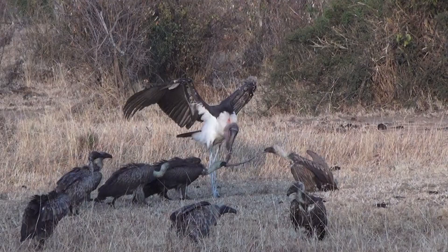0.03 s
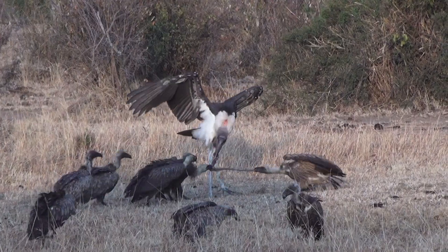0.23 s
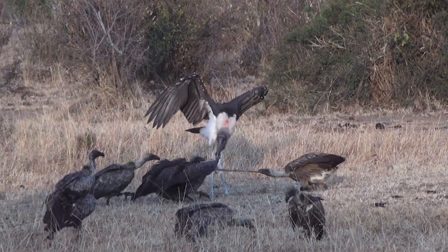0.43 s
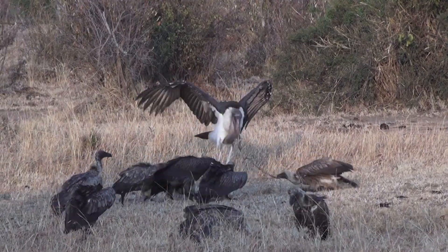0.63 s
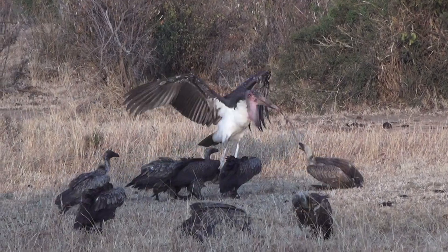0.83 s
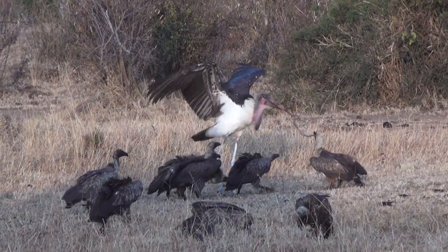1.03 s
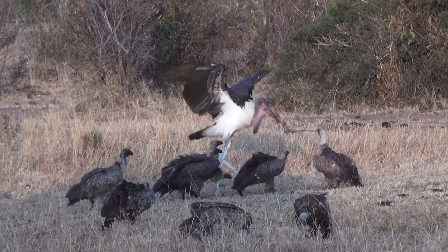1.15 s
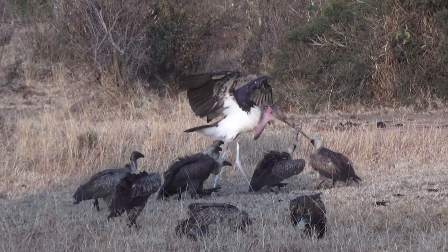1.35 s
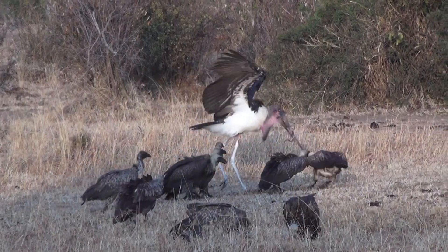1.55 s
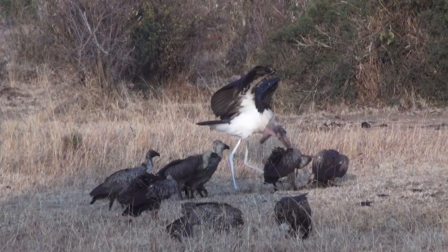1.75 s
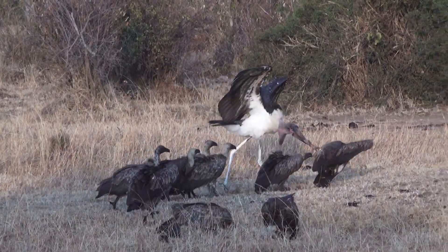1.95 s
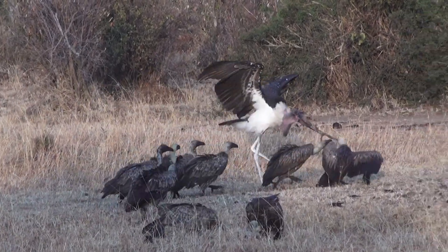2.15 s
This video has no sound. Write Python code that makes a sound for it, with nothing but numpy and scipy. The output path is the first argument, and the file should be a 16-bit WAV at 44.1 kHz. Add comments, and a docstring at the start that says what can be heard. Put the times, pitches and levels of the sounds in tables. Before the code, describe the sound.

Vultures and a stork squabble to the right. A harsh hiss starts at 0.4 seconds, sinking and fading by 0.8. From 1 second, quick rasps swell, peak near 1.9 and die away over faint flock wheezing and shuffling. Dry stalks crackle briefly around 0.2 and 0.75. Wind buffets the microphone from 0.3 to 1 second, and close, dull handling bumps come throughout, strongest around 0.6 and 0.85.

```python
"""A long harsh hiss, then a quick run of two-part rasps that swells and dies: vultures and a stork
squabble over a scrap, off to the right. Their calls are rough air ringing in the throat.
Dry stalks crackle underfoot, and the rest of the flock wheezes and shuffles faintly.
Close by, wind buffets the microphone and the camera body bumps as it is handled."""
import sys
import numpy as np
from scipy import signal
from scipy.fft import rfft, irfft
from scipy.io import wavfile
from scipy.ndimage import uniform_filter1d

SR = 44100
rng = np.random.default_rng(int(sys.argv[2]) if len(sys.argv) > 2 else 0)


def to_wav(sig):
    """Store sig (one row per channel, or 1-D mono) as 16-bit WAV at the path in sys.argv[1].

    Samples outside -1..1 are clipped; the rate is SR.
    """
    pcm = np.clip(np.atleast_2d(sig), -1, 1) * 32767
    pcm = np.round(pcm).astype(np.int16)
    wavfile.write(sys.argv[1], SR, pcm.T)  # frames by channels


N = 97020
T = np.arange(N) / SR
HZ = np.maximum(np.arange(N // 2 + 1) * SR / N, 1)
OPPOSITE = np.array([[1], [-1]])   # flips the right channel, so a sound feels wide

# The dull tone of the camera body. Each row: frequency in Hz, level in dB.
BODY_COLOUR = [(60, -17), (130, 5.5), (210, 4), (300, 5), (420, -7), (600, -16), (900, -58), (1600, -64)]


def from_db(db):
    """Turn decibels into a gain to multiply by."""
    return 10 ** (np.asarray(db) / 20)


def rms_one(x):
    """Scale a sound to an average power of 1."""
    return x / np.sqrt(np.mean(x ** 2) + 1e-20)


def level(rows):
    """Gain over time, joining points of (seconds, dB)."""
    return from_db(np.interp(T, *np.transpose(rows)))


def noise(colour):
    """Steady noise shaped by points of (Hz, dB), falling away beyond the ends."""
    hz, db = np.transpose(colour)
    gain = from_db(np.interp(np.log(HZ), np.log(hz), db))
    roll_off = np.minimum(1, np.minimum(HZ / hz[0], hz[-1] / HZ)) ** 2
    return rms_one(irfft(rfft(rng.standard_normal(N)) * gain * roll_off, N))


def wander(span_s):
    """A random wobble; a longer span makes it slower."""
    return rms_one(uniform_filter1d(rng.standard_normal(N), int(span_s * SR)))


def grainy(colour, grain_db, grain_s):
    """Noise whose level flickers from grain to grain."""
    flicker = from_db(grain_db * wander(grain_s))
    return rms_one(noise(colour) * flicker)


def evened(x, span_s):
    """Take the slow chance swings in level out of a noise."""
    return x / np.sqrt(uniform_filter1d(x ** 2, int(span_s * SR)) + 1e-6)


def resonate(x, hz, width_hz):
    """A resonance: it lets through one band of frequencies."""
    r = np.exp(-np.pi * width_hz / SR)
    section = [1 - r, 0, r - 1, 1, -2 * r * np.cos(2 * np.pi * hz / SR), r * r]
    return rms_one(signal.sosfilt([section, section], x))


def glide(x, hz, width_hz):
    """A resonance whose centre moves."""
    r = np.exp(-np.pi * width_hz / SR)
    turn = np.exp(2j * np.pi * np.cumsum(hz) / SR)
    band = signal.lfilter([1], [1, -2 * r, r * r], x / turn)   # shift down to 0 Hz and smooth
    return rms_one((band * turn).real)


def burst(start, hold, attack, release):
    """A gain that rises, holds, then dies away; all times in seconds."""
    return np.clip((T - start) / attack, 0, 1) * np.exp(-np.maximum(T - start - hold, 0) / release)


def pan(x, pan_db, centred_above_hz=9200):
    """Place a sound left (+) or right (-); the microphone has no direction in the top treble."""
    ratio = from_db(pan_db / (1 + (HZ / centred_above_hz) ** 6))
    return irfft(rfft(x) * 2 * np.array([ratio, np.ones_like(ratio)]) / (1 + ratio), N)


def still_air():
    """Quiet air and microphone hiss, over a faint wide rumble."""
    # The tone of the air and hiss. Each row: frequency in Hz, level in dB.
    colour = [(25, -65), (100, 5), (350, 14.5), (600, 6.5), (1000, 6), (3000, 7.5), (7500, 0), (11000, 0),
              (18000, -2)]
    return from_db(-64.5) * noise(colour) + from_db(-76.5) * noise(BODY_COLOUR) * OPPOSITE


def far_hiss():
    """A thin, distant hiss, strongest at the start."""
    # Its loudness. Each row: time in seconds, level in dB.
    loudness = [(0, -72), (.13, -64.5), (.45, -72.5), (.8, -79)]
    # Its two-peaked tone. Each row: frequency in Hz, level in dB.
    colour = [(2600, -42), (3300, -6), (3850, -16), (4550, -2), (5300, -22), (6300, -47)]
    return level(loudness) * grainy(colour, grain_db=1.5, grain_s=0.009)


def flock():
    """The other birds wheeze and shuffle, blurring into one flickering noise."""
    # Their loudness. Each row: time in seconds, level in dB.
    loudness = [(0, -67.5), (.4, -64.5), (.8, -62), (1.05, -58.5), (1.4, -60), (1.6, -63), (2.2, -66)]
    # Their tone. Each row: frequency in Hz, level in dB.
    colour = [(600, -15), (1100, -11), (1550, -3), (2300, 3), (3000, -3), (3900, -9), (4800, -10),
              (6200, -22.5), (9000, -19.5)]
    return level(loudness) * grainy(colour, grain_db=2.0, grain_s=0.0067)


def grass_rustle():
    """Dry grass gives one faint, high rustle."""
    # Its loudness. Each row: time in seconds, level in dB.
    loudness = [(1.63, -82), (1.708, -64), (1.80, -83)]
    # Its tone. Each row: frequency in Hz, level in dB.
    colour = [(7000, -23), (11000, -6), (14500, -14)]
    return level(loudness) * grainy(colour, grain_db=5.0, grain_s=0.0024)


def stalk_crackles(snaps_per_s=2000):
    """Each crackle is a cluster of tiny snaps in dry stalks."""
    # The crackles. Each row: start in seconds, level in dB, length in seconds, centre in Hz.
    crackles = [(0.232, -58, 0.017, 2080), (0.232, -64, 0.008, 5640), (0.752, -49.5, 0.0049, 4640),
                (2.08, -62, 0.0011, 7200)]
    snaps = rng.standard_normal(N) * (rng.random(N) < snaps_per_s / SR) + 1e-18
    out = 0
    for start, db, length, hz in crackles:
        gain = from_db(db) * burst(start, length, attack=0.0005, release=0.0034)
        out += gain * resonate(snaps, hz, width_hz=0.51 * hz)
    return out


def wind():
    """Gusts buffet the microphone with a deep rumble, a little to the left."""
    # The gusts. Each row: time in seconds, level in dB.
    gusts = [(0, -66), (.17, -62), (.27, -39.5), (.31, -48), (.365, -36), (.42, -42), (.48, -49),
             (.54, -43), (.64, -40.5), (.715, -59.5), (.78, -55), (.875, -50.5), (.925, -44.5),
             (1.02, -60.5), (1.28, -69), (1.32, -67), (1.38, -71), (2.2, -71.5)]
    # The rumble's tone. Each row: frequency in Hz, level in dB.
    colour = [(22, -30), (36, -3.5), (60, 4), (110, 5.5), (165, -1), (240, -13.5), (400, -38), (700, -55)]
    buffet = pan(evened(noise(colour), span_s=0.0305), pan_db=3)
    sides = from_db(-14) * noise(colour) * OPPOSITE
    return level(gusts) * (buffet + sides)


def hand_rub():
    """A hand rubs on the camera body."""
    # The strokes. Each row: time in seconds, level in dB.
    strokes = [(0, -71), (.3, -65.5), (.37, -50.5), (.5, -66), (.61, -45), (.72, -68), (.8, -62.5),
               (.86, -39.5), (.93, -52.5), (1.03, -72), (1.27, -60), (1.34, -51.5), (1.48, -76),
               (1.66, -87), (1.76, -53), (1.87, -61), (2.2, -57.5)]
    return level(strokes) * evened(noise(BODY_COLOUR), span_s=0.0206)


def drone():
    """A low drone at the microphone comes and goes."""
    # Its loudness. Each row: time in seconds, level in dB.
    loudness = [(1.0, -81), (1.09, -66), (1.2, -48), (1.29, -63), (1.43, -53.5), (1.49, -72)]
    sounding = (T > loudness[0][0]) * (T < loudness[-1][0])
    hum = resonate(rng.standard_normal(N), hz=196, width_hz=57)
    return level(loudness) * sounding * evened(hum, span_s=0.022)


def body_bumps(rise_cycles=0.5):
    """Each bump swings the camera body for a few cycles, with a dull tick on top."""
    # The bumps. Each row: start in seconds, level in dB, pitch in Hz, relative tick strength in dB.
    bumps = [(0.274, -36, 122, -34), (0.352, -35.5, 199, -30), (0.362, -35.5, 154, -39),
             (0.377, -31.5, 207, -28), (0.436, -32, 148, -23), (0.591, -28, 169, -31),
             (0.603, -27.5, 151, -47), (0.633, -31.5, 142, -23), (0.832, -43, 293, -31),
             (0.844, -25.5, 195, -13), (0.854, -24.5, 136, -26), (0.87, -39, 65, -37),
             (0.888, -32.5, 306, -19.5), (1.017, -33.5, 203, -15), (1.307, -38.5, 186, -25),
             (1.319, -38, 212, -18), (1.347, -33.5, 216, -11.5), (1.377, -33.5, 217, -18),
             (1.427, -45, 246, -4), (1.704, -45.5, 235, -34), (1.763, -45, 290, -8), (1.974, -45, 305, -10),
             (2.185, -43.5, 300, -37)]
    # The tick's tone. Each row: frequency in Hz, level in dB.
    tick_colour = [(200, 8), (380, 13.5), (600, -5.5), (850, -6), (1200, -17.5), (1900, -47)]
    tick_noise = evened(noise(tick_colour), span_s=0.0057)
    out = 0
    for start, db, hz, tick_db in bumps:
        cycles = np.maximum(T - start, 0) * hz
        age = cycles / rise_cycles
        swing = age * np.exp(1 - age) * np.sin(2 * np.pi * cycles)
        tick = tick_noise * burst(start, hold=0.00465, attack=0.0017, release=0.00465)
        out += from_db(db) * (swing + from_db(tick_db + 3) * tick)
    return out


def housing_clicks():
    """Sharper clicks: the camera housing rings for a moment."""
    # The clicks. Each row: start in seconds, level in dB, pitch in Hz.
    clicks = [(1.026, -46.5, 890), (1.428, -39, 1110), (1.942, -48, 930)]
    out = 0
    for start, db, hz in clicks:
        ring = np.sin(2 * np.pi * hz * (T - start))
        out += from_db(db) * burst(start, hold=0, attack=0.00057, release=0.002) * ring
    return out


def handling(split_hz=183):
    """The camera is handled: deep sound leans left, higher sound right, clicks stay central."""
    upper_share = 1 / (1 + (split_hz / HZ) ** 6)
    pan_db = 6 * (1 - upper_share) - 3 * upper_share
    return pan(hand_rub() + drone() + body_bumps(), pan_db) + housing_clicks()


def thicket_echo(x, fade_s=0.058):
    """Add the faint scatter from the ground and the thicket behind."""
    tail = rng.standard_normal(SR // 2) * from_db(-60 * T[:SR // 2] / fade_s)
    return x + from_db(-14.5) * signal.fftconvolve(x, tail / np.linalg.norm(tail))[:N]


def rough_air(pulse_hz, rough, jitter):
    """Rushing air chopped by an uneven flutter in the throat."""
    cycles = np.cumsum(pulse_hz * np.exp(jitter * wander(span_s=0.005))) / SR
    flutter = np.exp(rough * np.cos(2 * np.pi * cycles))
    return rms_one(rng.standard_normal(N) * flutter)


def hiss_tail():
    """One narrow resonance slides down as the long hiss runs out."""
    # The slide. Each row: time in seconds, centre in Hz, level in dB.
    slide = [(0.551, 2960, -66), (.62, 2800, -58), (.68, 2470, -51), (.74, 2430, -56), (0.80, 2280, -61.5),
             (.85, 2200, -89)]
    times, hz, db = np.transpose(slide)
    sounding = (T > times[0]) * (T < times[-1])
    breath = glide(rng.standard_normal(N), np.interp(T, times, hz), width_hz=550)
    return from_db(np.interp(T, times, db)) * sounding * evened(breath, span_s=0.033)


def long_hiss(peak_s=0.529, sink_octaves_per_s=1.25, bill_closes_s=.58, closing_s=.04):
    """Rough air through sinking throat resonances; it darkens as the bill closes halfway."""
    # The push of breath. Each row: time in seconds, level in dB.
    loudness = [(.41, -71), (.44, -52), (.475, -43.5), (.52, -39.5), (.565, -44.5), (.59, -49.5),
                (.68, -54), (.75, -59), (.85, -96)]
    # Throat resonances. Each row: centre in Hz, width in Hz before widening,
    # level in dB with the bill wide open, level in dB with it half closed.
    throat = [(1303, 124, -14, -5.5), (1714, 240, -7.5, -5), (2090, 210, -2, -5), (2364, 370, -7, 0),
              (2932, 530, 2, 2.5), (3580, 410, -6, -4), (4330, 850, -4, -7), (5100, 650, -11.5, -10),
              (5810, 250, -12.5, -20), (7500, 550, -18.5, -25), (8600, 1000, -20, -48)]
    air = rough_air(pulse_hz=204.1, rough=.4, jitter=.4)
    closed = np.clip((T - bill_closes_s) / closing_s + .5, 0, 1)
    past_peak = np.maximum(T, loudness[0][0]) - peak_s
    sink = 2 ** (-sink_octaves_per_s * (1 - closed) * past_peak)   # only while the bill is open
    voice, power = 0, 0
    for k, (hz, width, open_db, closed_db) in enumerate(throat):
        gain = from_db(open_db + closed * (closed_db - open_db))
        voice += (-1) ** k * gain * glide(air, hz * sink, width * 1.14)   # neighbours flip sign
        power += gain ** 2
    return level(loudness) * voice / np.sqrt(power)


def rasps():
    """About thirteen rasps a second, each a short catch of breath and then a longer scrape."""
    # The rasps. Each row: start and scrape length in seconds, scrape and catch levels in dB,
    # main resonance in Hz, its strength in dB, upper resonance in Hz, bright edge in dB.
    calls = np.array([(1.029, 0.025, -61, -56.5, 2190, -15, 4630, -19),
                      (1.154, 0.04, -52.5, -62, 2340, 6, 3040, -31),
                      (1.253, 0.014, -57, -59, 2140, 7, 3030, -22),
                      (1.327, 0.024, -53, -57, 2500, -5, 3960, -15),
                      (1.405, 0.018, -57, -52, 2400, -1, 3460, -14),
                      (1.468, 0.030, -52, -53, 2150, 4, 3970, -12.5),
                      (1.539, 0.021, -48.5, -46, 2200, 4, 3330, -10),
                      (1.612, 0.025, -54.5, -52.5, 2310, 1, 3120, -7),
                      (1.691, 0.013, -56.5, -61, 2050, 10, 5100, -7),
                      (1.766, 0.023, -50.5, -50.5, 1900, 2.5, 3370, -13),
                      (1.842, 0.028, -46.5, -49.5, 2370, 6.5, 4300, -18),
                      (1.913, 0.037, -45, -49.5, 2540, 9, 4760, -12.5),
                      (1.992, 0.036, -52.5, -48, 2400, 4.5, 3180, -12),
                      (2.064, 0.035, -60, -55, 2400, 0, 3370, -2)])
    # Throat resonances that all rasps share. Each row: centre in Hz, width in Hz, level in dB.
    resonances = [(1478, 230, -8), (2003, 390, -2.5), (3090, 600, -4), (4370, 1600, -10.5)]
    scrape_delay_s, middle_s, attack_s, release_s = 0.01254, 0.027, .0015, 0.0045
    sink_octaves_per_s, firm_db_per_s, sag_db_per_s = 2.8, 142, 58
    pulse_hz, width_hz = 394, 610
    current = np.maximum(np.searchsorted(calls[:, 0], T) - 1, 0)   # which rasp each sample is in
    start, length, scrape_db, catch_db, main_hz, main_db, upper_hz, edge_db = calls[current].T
    scrape_start = start + scrape_delay_s
    past_middle = np.clip(T - start - middle_s, -middle_s, middle_s)
    sink = 2 ** (-sink_octaves_per_s * past_middle)   # the throat relaxes during each rasp

    air = rough_air(pulse_hz, rough=.7, jitter=.3)
    steadier_air = rough_air(pulse_hz, rough=.7, jitter=.16)
    throat = sum((-1) ** k * from_db(db) * glide(air, hz * sink, width)
                 for k, (hz, width, db) in enumerate(resonances))
    main = from_db(main_db + firm_db_per_s * past_middle) * glide(steadier_air, main_hz * sink, width_hz)
    upper = from_db(-7.5) * glide(steadier_air, upper_hz * sink, width_hz)
    edge = from_db(edge_db) * resonate(air, hz=5450, width_hz=2800)
    treble = from_db(2.5 * (T < scrape_start)) * (upper + edge)   # the catch is brighter
    voice = evened(main + throat + treble, span_s=0.0059)

    catch = from_db(catch_db) * burst(start, hold=.004, attack=attack_s, release=0.0025)
    sag_db = sag_db_per_s * np.maximum(T - scrape_start, 0)
    scrape = from_db(scrape_db - sag_db) * burst(scrape_start, length - release_s / 2, attack_s, release_s)
    return voice * (catch + scrape)


def scene():
    """Birds on the right, wind and handling at the microphone."""
    squabble = pan(thicket_echo(long_hiss() + hiss_tail() + rasps()), pan_db=-9.5)
    background = pan(flock(), pan_db=-11.5) + pan(far_hiss(), pan_db=-6)
    grass = pan(stalk_crackles(), pan_db=-6.5) + grass_rustle()
    return squabble + background + grass + wind() + still_air() + handling()


def record(dry):
    """Cut the top treble steeply above 18300 Hz."""
    return signal.sosfilt(signal.ellip(10, .1, 70, 18300, fs=SR, output="sos"), dry)


dry = scene()
out = record(dry)
to_wav(out)
```